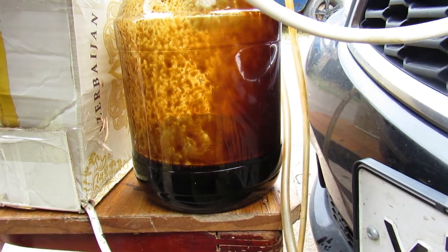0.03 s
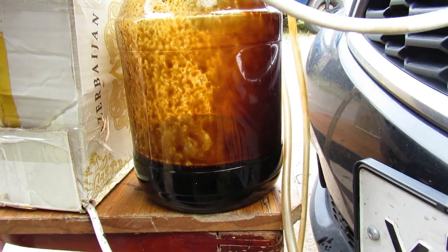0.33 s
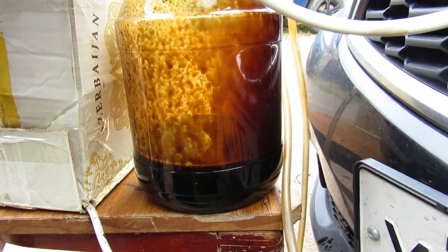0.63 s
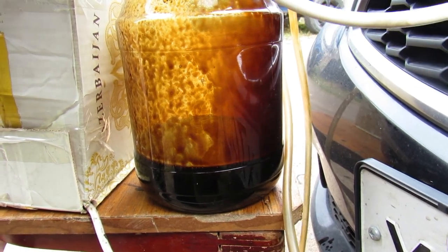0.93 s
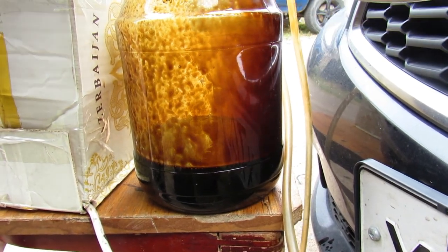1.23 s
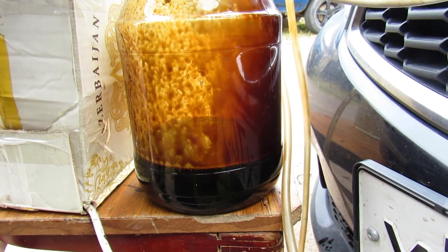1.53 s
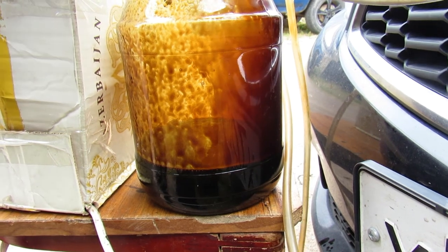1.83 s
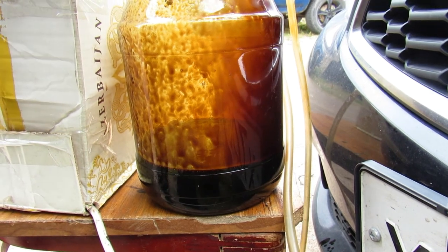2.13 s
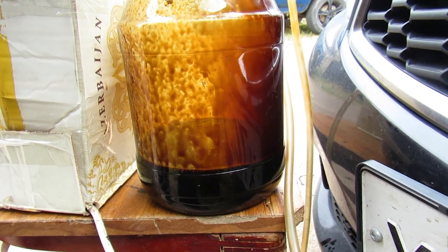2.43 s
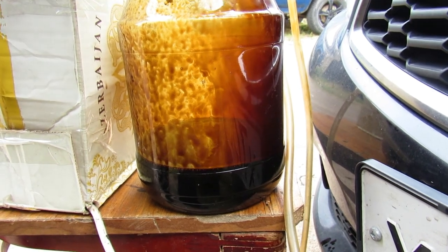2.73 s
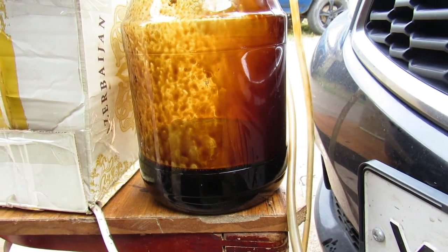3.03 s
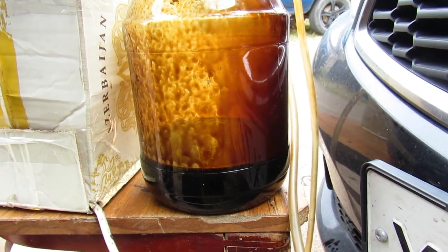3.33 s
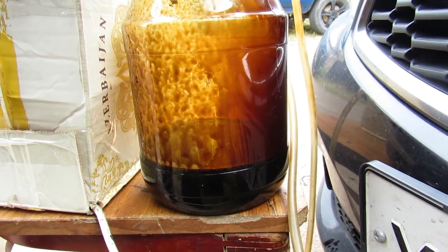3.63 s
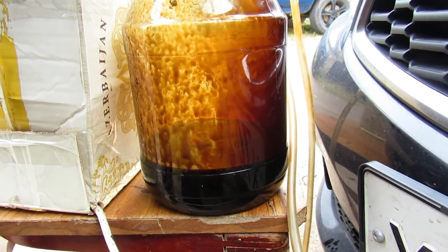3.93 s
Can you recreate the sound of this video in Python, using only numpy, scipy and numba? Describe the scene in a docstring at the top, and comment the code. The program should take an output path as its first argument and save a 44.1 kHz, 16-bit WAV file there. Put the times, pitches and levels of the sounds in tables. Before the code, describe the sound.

Small pump humming and rumbling as frothy oil hisses and spits through a thin tube.

```python
"""A small suction pump hums and rumbles throughout, drawing oil and air through a thin tube into a jar.
From the start the froth sputters in quick spurts of tiny bursting films, over a light breeze.
Near 2.8 s a solid slug of oil fills the tube: for a second only a few bubbles tick, while gusts
buffet the microphone. At 3.8 s air breaks through, spitting and snapping, and the sputter returns."""
import sys
import numpy as np
from scipy import signal
from scipy.fft import rfft, irfft
from scipy.io import wavfile
from scipy.ndimage import uniform_filter1d
from numba import njit

SR = 44100
rng = np.random.default_rng(int(sys.argv[2]) if len(sys.argv) > 2 else 0)


def store_pcm(level_fs):
    """Save levels as 16-bit WAV."""
    pcm = np.round(np.clip(level_fs, -1, 1) * 32767).astype(np.int16)
    wavfile.write(sys.argv[1], SR, np.atleast_2d(pcm).T)


N = 176400

# where the pump and jar sit in the image: freq_hz, left_minus_right_db
BALANCE = [(55, -19), (110, -16), (280, -8.5), (900, -3.5), (2400, -0.74)]
# phase between the microphone ports: freq_hz, left_lead_rad
PHASE_LEAD = [(100, 0.91), (700, 0.64), (1200, 0.93), (1900, 0.02), (8000, 0), (10400, 0.54)]

# EQ of the breeze on the ports: freq_hz, gain_db
BREEZE_EQ = [(15, -24), (36, -12), (50, 5.5), (70, 3), (170, -8.5), (600, -35)]
# EQ of the gusts: freq_hz, gain_db
GUST_EQ = [(25, -20.5), (100, 2), (150, -3.5), (220, -20), (800, -56)]
# single gusts: peak_s, level_db, half_length_s
GUSTS = [(1.232, -33, .012), (2.86, -13.5, 0.026), (2.93, -19, .014), (3.467, -8.5, 0.009),
         (3.567, -11, 0.021)]

# pump tones: pitch_hz, level_db
HUM_TONES = [(107.25, -31.5), (270.5, -45), (348, -53)]
# fader on those tones: time_s, gain_db
HUM_FADE = [(0, -5.5), (2.7, -1), (3.8, -7.5)]
# a further tone that creeps up with the load: time_s, pitch_hz, level_db
LOAD_TONE = [(0, 134, -48), (.8, 137.9, -37.5), (1.7, 142.5, -33.5), (2.5, 144.9, -42), (4, 150.1, -43.5)]
# EQ of the pump's rumble: freq_hz, gain_db
RUMBLE_EQ = [(25, -35), (49, -1.5), (90, -.5), (155, 3), (182, -6), (210, -2.5), (238, -6.5), (290, -4.5),
             (350, -11), (405, -19), (470, -15), (600, -19), (720, -47.5)]
# fader on the housing's buzz: time_s, level_db
BUZZ_FADE = [(0, -38), (1.2, -37.5), (2.2, -56.5), (4, -48)]
# EQ of the running pump's steady rush: freq_hz, gain_db
RUSH_EQ = [(400, -10), (950, 3), (1300, -4.5), (1900, -14.5), (3200, -28.5), (8000, -23.5), (16000, -29)]

# large bubbles that pop with a pitch: start_s, pitch_hz, level_db
PLIPS = [(2.816, 2450, -30), (3.426, 2020, -32), (3.8165, 2110, -13)]
# ring of the last air pocket: pitch_hz, level_db
POCKET_MODES = [(2400, -50), (3240, -51)]
# single spits of air: start_s, hiss_db, splatter_db, decay_s
SPITS = [(0.481, -21, -33, 0.0024), (0.677, -20.5, -31, 0.0028), (1.834, -26, -42, 0.0016),
         (2.611, -25, -28, 0.0024), (2.658, -30, -27, 0.0057), (2.709, -29, -25, 0.0018),
         (2.734, -40, -25, 0.0024), (2.762, -30, -26, 0.0017), (3.604, -45, -38, .003),
         (3.641, -45, -41, .003), (3.682, -45.5, -48, 0.0061), (3.7872, -21.5, -26, 0.0053),
         (3.8125, -19.5, -32, 0.0051), (3.8163, -15.5, -31, 0.0022), (3.911, -16, -26, 0.0025),
         (3.92, -43, -20, 0.0027), (3.969, -15, -29, 0.0061)]
# EQ of a spit's hiss: freq_hz, gain_db
SPIT_EQ = [(1500, -9), (7000, -9.5), (9400, 1), (16000, -13)]
# sharp snaps of large films: start_s, level_db
SNAPS = [(3.817, -4), (3.8405, -3), (3.9505, -4)]
# EQ of a snap: freq_hz, gain_db
SNAP_EQ = [(400, -13), (1800, 6), (6000, -4), (16000, -2)]

# faders on the froth until air breaks through: time_s, hiss_db, crackle_db, splatter_db, tube_ring_db
FROTH_FADES = [(0, -30, -34.5, -33.5, -37), (.4, -31.5, -37.5, -35, -48), (.8, -31, -40, -38, -42),
               (1.4, -33, -41.5, -40.5, -44), (2.45, -33, -44.5, -44, -44), (2.63, -36, -40.5, -40, -46),
               (2.74, -46.5, -42, -41, -47), (2.82, -67, -53, -39, -64), (2.88, -83, -62, -58, -70),
               (3.55, -68, -62, -57, -80), (3.66, -61, -55, -51, -64), (3.76, -68, -61, -52.5, -70)]
# EQ of the hiss at the tube's mouth: freq_hz, gain_db
HISS_EQ = [(4000, -38), (6800, -13.5), (8200, -0.5), (10600, 0.5), (11300, -2), (12400, -0.5),
           (13400, -4.5), (16000, -6)]
# EQ of the fine crackle: freq_hz, gain_db
CRACKLE_EQ = [(700, -16), (2900, -14), (3400, 0.5), (5900, -.5), (7500, 0.5), (11000, -13.5), (16000, -9)]
# EQ of the splatter in the jar: freq_hz, gain_db
SPLATTER_EQ = [(520, -15), (700, -19.5), (860, -5), (1100, -3.5), (1620, -1), (2700, -3), (3050, -8.5),
               (3500, -8), (6000, -23)]
# peak of the hiss, climbing as the air thins, then falling back: time_s, centre_hz
JET_PEAK = [(0, 9900), (1, 10000), (1.7, 11300), (2.6, 11700), (3.7, 8400)]
# narrow hiss at the mouth, sinking as the gap changes: time_s, pitch_hz, level_vs_hiss_db
WHISTLE = [(0, 7480, -19), (1.1, 6860, -17), (1.4, 6580, -19), (2.6, 6350, -19)]
# modes of the tube: pitch_hz, width_hz, level_db
TUBE_MODES = [(1690, 240, -9), (2107, 300, -0.5), (3400, 350, -12.5)]

BREAK_S, BREAK_RISE_S = 3.8135, 0.0067  # air breaks through
BREAK_DB = (-28.5, -33, -29.5, -38)  # hiss, crackle, splatter and tube ring from then on
HISS_STEREO, CRACKLE_STEREO, SPLATTER_STEREO = 0.24, 0.09, 0.08  # side gain of the jar's tail


def undb(db):
    """Decibels to gain."""
    return 10 ** (np.asarray(db) / 20)


def unit(x):
    """Scale to rms 1."""
    return x / np.sqrt(np.mean(x ** 2))


def curve(table, column=1):
    """Automation: one column of a table, joined by straight lines in time."""
    rows = np.array(table, float)
    return np.interp(np.arange(N) / SR, rows[:, 0], rows[:, column])


def over_hz(points):
    """Spread a (Hz, value) table over every frequency bin."""
    rows = np.array(points, float)
    return np.interp(np.log(np.arange(N + 1) * SR / (2 * N) + 1), np.log(rows[:, 0]), rows[:, 1])


def colour(x, eq):
    """Minimum-phase EQ of unit energy: the table sets only the tone colour."""
    cepstrum = irfft(np.log(undb(over_hz(eq))))
    cepstrum[1:N] *= 2
    cepstrum[N + 1:] = 0
    response = np.exp(rfft(cepstrum))
    return irfft(rfft(x, 2 * N) * response / np.sqrt(np.mean(abs(response) ** 2)))[..., :N]


@njit
def bandpass(x, hz, width):
    """State-variable band-pass with a moving centre."""
    y, band, low = np.empty(len(x)), 0., 0.
    for i in range(len(x)):
        g, damping = np.tan(np.pi * hz[i] / SR), width / hz[i]
        v = (band + g * (x[i] - low)) / (1 + g * (g + damping))
        band, low, y[i] = 2 * v - band, low + 2 * g * v, damping * v
    return y


def resonance(x, hz, width_hz):
    """A steep resonance: two band-passes in series, scaled to rms 1."""
    centre, width = hz * np.ones(N), float(width_hz)
    return unit(bandpass(bandpass(x, centre, width), centre, width))


def drift(rate_hz):
    """Smooth random modulation with a spread near 1."""
    hold = int(SR / rate_hz)
    steps = np.repeat(rng.standard_normal(400)[:N // hold + 1], hold)
    return 1.33 * uniform_filter1d(uniform_filter1d(steps, hold), hold)[:N]


def stereo_noise(correlation):
    """White noise, partly alike on left and right."""
    mid, side = rng.standard_normal((2, N))
    return unit(np.sqrt(1 + correlation) * mid + np.sqrt(1 - correlation) * np.array([side, -side]))


def place(x):
    """Lean the lows to the right and shift the phase between the ports."""
    sides = np.array([[.5], [-.5]])
    gains = undb(sides * over_hz(BALANCE)) * np.exp(1j * sides * over_hz(PHASE_LEAD))
    return irfft(rfft(x, 2 * N) * gains / np.sqrt(np.mean(abs(gains) ** 2, axis=0)))[:, :N]


def wind(breeze_db=-32.5, ceiling=.5):
    """A breeze and a few gusts push the two ports in opposite directions; the hardest pushes saturate."""
    t = np.arange(N) / SR
    rolloff = [(2000, -90)]
    swells = sum(undb(db) * np.exp(-.5 * ((t - peak) / half) ** 2) for peak, db, half in GUSTS)
    gusts = swells * unit(colour(stereo_noise(-0.88), GUST_EQ + rolloff))
    breeze = undb(breeze_db) * unit(colour(stereo_noise(-0.41), BREEZE_EQ + rolloff))
    return breeze + ceiling * np.tanh(gusts / ceiling)


def motor_tone(hz):
    """A sine of rms 1 that follows a pitch curve."""
    return np.sqrt(2) * np.sin(2 * np.pi * np.cumsum(hz) / SR)


def pump(rumble_db=-29, rush_db=-44.5, hum_left_vs_right_db=-11):
    """The pump's bed: wavering motor tones over rumble, housing buzz and a steady rush."""
    hum = sum(motor_tone(hz * (1 + 0.0052 * drift(5.965))) * undb(db + 3.5 * drift(4.77))
              for hz, db in HUM_TONES)
    load = motor_tone(curve(LOAD_TONE) * (1 + 0.013 * drift(12)))
    load *= undb(curve(LOAD_TONE, column=2) + 4.5 * drift(6.86))
    tones = hum * undb(curve(HUM_FADE)) + load
    rumble = unit(colour(stereo_noise(0.54), RUMBLE_EQ + [(1400, -89.5)]))
    buzz = resonance(rng.standard_normal(N), hz=278.7, width_hz=80) * undb(curve(BUZZ_FADE))
    rush = colour(stereo_noise(0.66), RUSH_EQ) * undb(rush_db + 0.9 * drift(60))
    rumble *= undb(rumble_db + 0.71 * drift(16))
    pan = unit(undb([[hum_left_vs_right_db], [0]]))
    return place(rumble + buzz + rush) + tones * pan


def jar(x, stereo, t60_s=0.06, tail_db=-7.5):
    """A short diffuse smear from the wet walls, partly different at each ear."""
    pole = np.exp(-2 * np.log(1000) / (t60_s * SR))
    envelope = np.sqrt(signal.lfilter([1 - pole], [1, -pole], x ** 2 + 1e-18))
    tail = envelope * rng.standard_normal((2, N))
    mid, side = x + undb(tail_db) * tail[0], stereo * tail[1]
    return np.array([mid + side, mid - side])


def comb(x, delays_s=(0.001106, .0023, .0037), echo_db=-19.5):
    """Echoes from glass and froth comb the sputter, drifting as the froth moves."""
    n, gain = np.arange(N), undb(echo_db)
    taps = [n - delay * SR * (1 + 0.027 * drift(2)) for delay in delays_s]
    echoes = np.array([sum(np.interp(tap, n, ear) for tap in taps) for ear in x])
    return (x + gain * echoes) / np.sqrt(1 + len(delays_s) * gain ** 2)


def spurts(per_s=190, rise_s=0.0006, decay_s=0.0027, spread_db=3.5, steady_share=0.74):
    """Sputter envelope: each plug of oil leaving the tube lets out a sharp puff that dies away."""
    onsets = rng.random(N) < per_s / SR
    puffs = onsets * undb(spread_db * np.clip(rng.standard_normal(N), -2, 2))
    power = signal.lfilter([1], [1, -np.exp(-2 / (decay_s * SR))], puffs ** 2)
    power = signal.lfilter([1], [1, -np.exp(-1 / (rise_s * SR))], power)
    power /= uniform_filter1d(power, SR // 14) + 1e-9  # level out the slow swings
    return np.sqrt(steady_share + (1 - steady_share) * power)


def films(per_s=16000, spread_db=2.5):
    """Dense clicks of bursting oil films: many small, a few large."""
    clicks = (rng.random(N) < per_s / SR) * rng.choice([-1, 1], N)
    sizes = undb(spread_db * np.minimum(rng.exponential(size=N), 5))
    return unit(clicks * sizes)


def bubbles(per_s=1400, ring_s=0.0035, low_hz=1204, high_hz=14995):
    """Small bubbles, each ringing briefly at its own pitch and gliding up."""
    age = np.arange(900) / SR
    out = np.zeros(N + len(age))
    for when, pitch, strength in rng.random((int(per_s * N / SR), 3)):
        hz = low_hz * (high_hz / low_hz) ** pitch
        start = int(when * N)
        envelope = (.5 + strength) * np.sqrt(hz) * np.exp(-age / ring_s)
        out[start:start + len(age)] += envelope * np.sin(2 * np.pi * hz * age * (1 + 2 * age))
    return unit(out[:N])


def plips(ring_s=.003):
    """Large bubbles pop, ring briefly and glide up."""
    out = np.zeros(N)
    for start, hz, db in PLIPS:
        age = np.maximum(np.arange(N) / SR - start, 0)
        out += undb(db) * np.exp(-age / ring_s) * np.sin(2 * np.pi * hz * age * (1 + 3 * age))
    return out


def slurp(peak_s=2.8, half_length_s=.03):
    """Crackles ring the last pocket of air just before oil fills the tube."""
    swell = np.exp(-.5 * ((np.arange(N) / SR - peak_s) / half_length_s) ** 2)
    crackles = films() * spurts() ** 2
    return swell * sum(undb(db) * resonance(crackles, hz, width_hz=240) for hz, db in POCKET_MODES)


def spits():
    """Accents: single puffs of air hiss and splatter, and a few large films snap."""
    t = np.arange(N) / SR
    hiss_gain, splatter_gain, snaps = np.zeros((3, N))
    for start, hiss_db, splatter_db, decay in SPITS:
        envelope = (t >= start) * np.exp(-abs(t - start) / decay)
        hiss_gain += undb(hiss_db) * envelope
        splatter_gain += undb(splatter_db) * envelope
    for start, db in SNAPS:
        snaps[int(start * SR)] = undb(db)
    hiss = colour(jar(hiss_gain * films(), HISS_STEREO), SPIT_EQ)
    jet = .5 * hiss_gain * resonance(films(), curve(JET_PEAK), width_hz=750)
    splatter = colour(jar(splatter_gain * films(), SPLATTER_STEREO), SPLATTER_EQ)
    return hiss + jet + splatter + colour(snaps, SNAP_EQ)


def froth(bubble_share=0.23, jet_vs_hiss_db=-8):
    """Spurts of films and bubbles hiss at the mouth, crackle, splatter in the jar and ring the tube."""
    puffs, ringing = spurts(), bubbles()
    opened = np.clip((np.arange(N) / SR - BREAK_S) / BREAK_RISE_S, 0, 1)
    hiss_gain, crackle_gain, splatter_gain, tube_gain = (
        puffs * ((1 - opened) * undb(curve(FROTH_FADES, column)) + opened * undb(db))
        for column, db in enumerate(BREAK_DB, start=1))

    def layer(gain, eq, stereo):
        """A blend of film clicks and bubbles, smeared by the jar and coloured."""
        fizz = np.sqrt(1 - bubble_share) * films()
        fizz += np.sqrt(bubble_share) * np.roll(ringing, rng.integers(N))
        return colour(jar(fizz * gain, stereo), eq)

    hiss = layer(hiss_gain, HISS_EQ, HISS_STEREO)
    crackle = layer(crackle_gain, CRACKLE_EQ, CRACKLE_STEREO)
    splatter = layer(splatter_gain, SPLATTER_EQ, SPLATTER_STEREO)
    clicks = films()
    jet = hiss_gain * undb(jet_vs_hiss_db) * resonance(clicks, curve(JET_PEAK), width_hz=2700)
    whistle = hiss_gain * undb(curve(WHISTLE, column=2)) * resonance(clicks, curve(WHISTLE), width_hz=210)
    tube = tube_gain * sum(undb(db) * resonance(clicks, hz, width) for hz, width, db in TUBE_MODES)
    return comb(hiss + crackle + jet) + splatter + whistle + tube


def scene():
    """The mix: pump bed, sputtering tube and wind."""
    return pump() + place(froth() + spits() + slurp() + plips()) + wind()


def record(dry, top_hz=15850):
    """The recorder cuts the top with a steep low-pass."""
    return signal.sosfilt(signal.ellip(10, .2, 70, top_hz, fs=SR, output="sos"), dry)


dry = scene()
out = record(dry)
store_pcm(out)
```